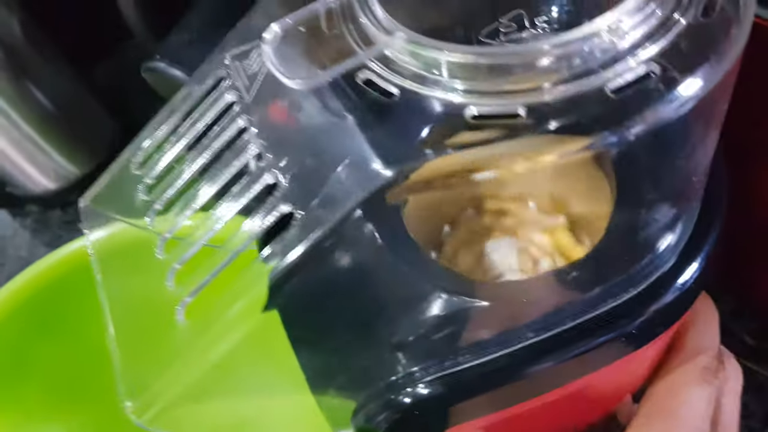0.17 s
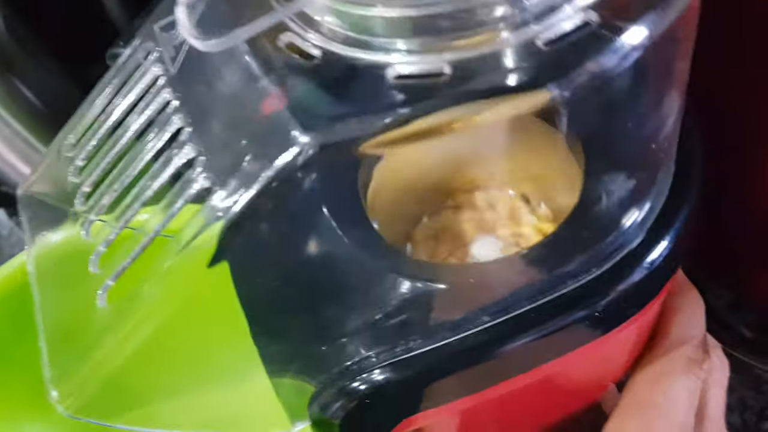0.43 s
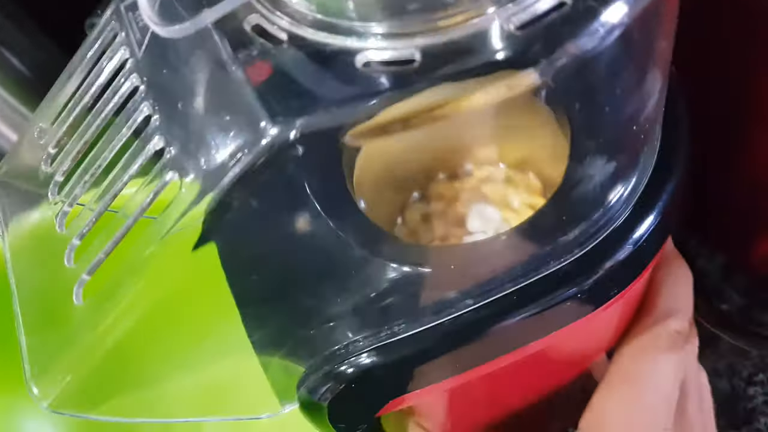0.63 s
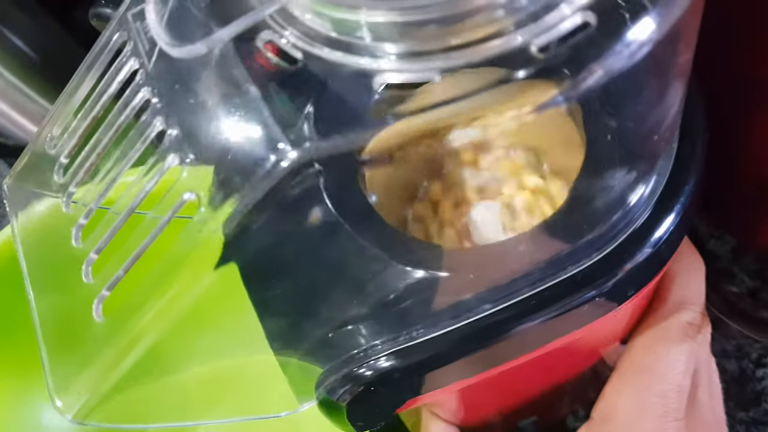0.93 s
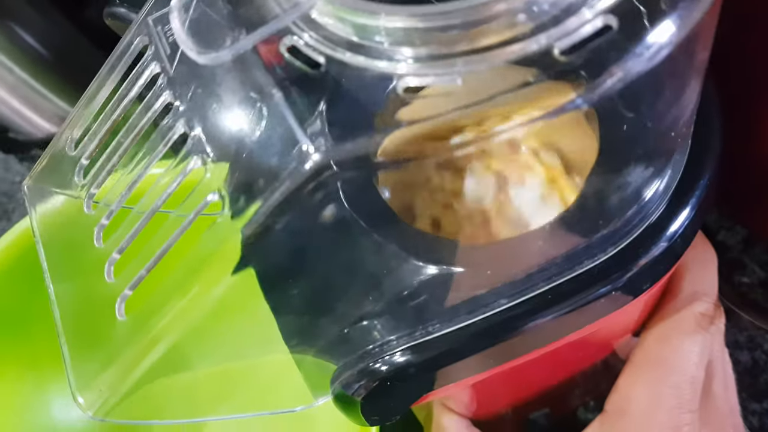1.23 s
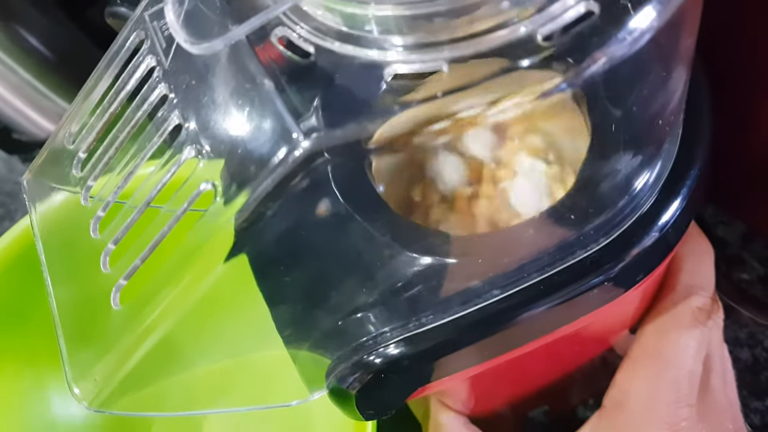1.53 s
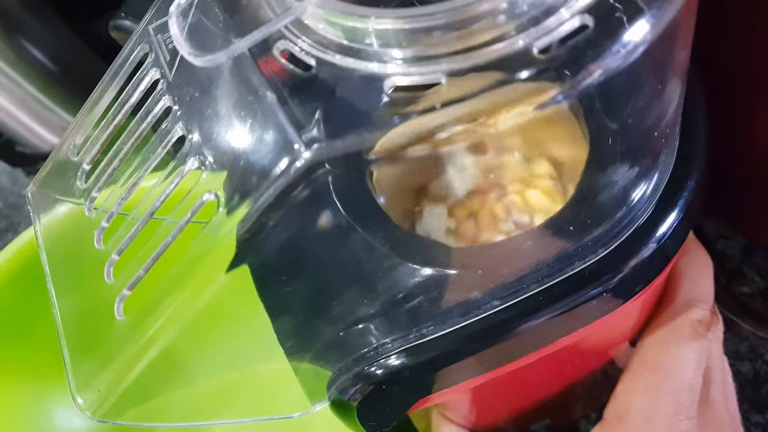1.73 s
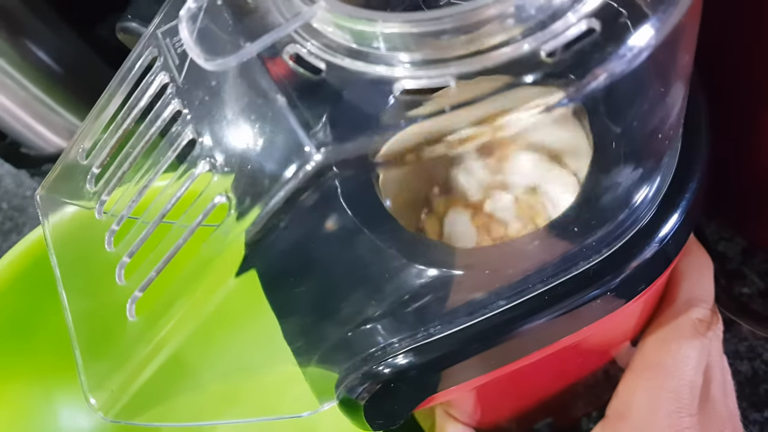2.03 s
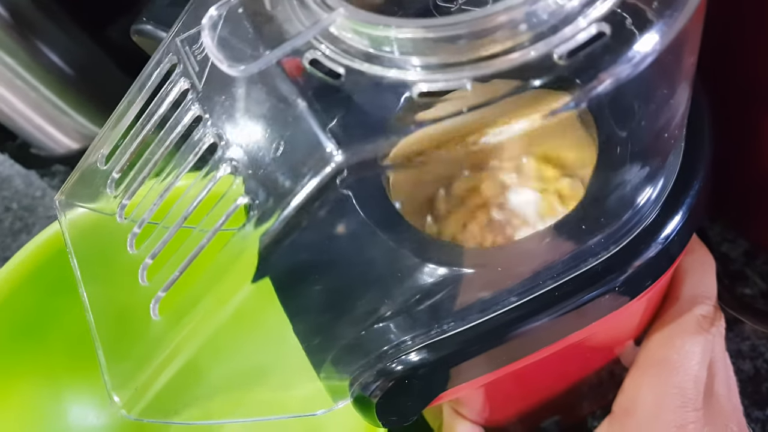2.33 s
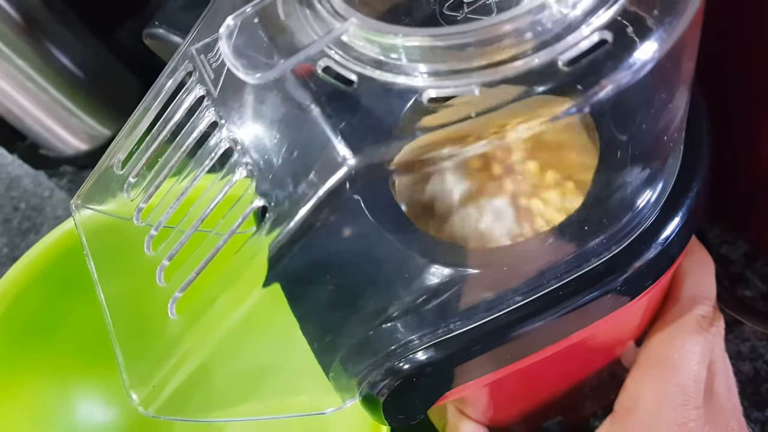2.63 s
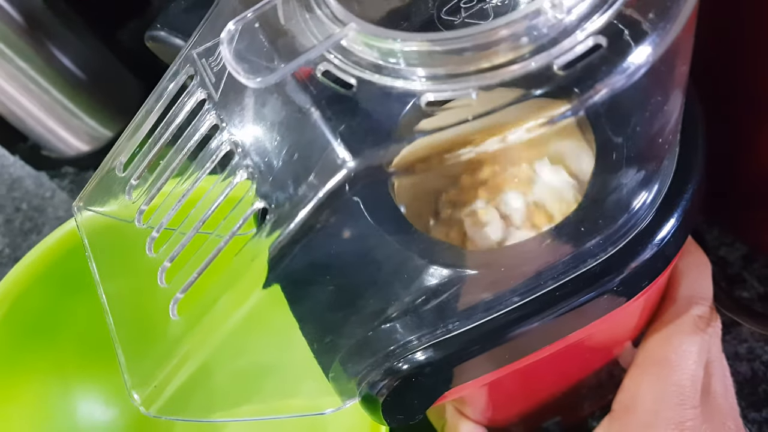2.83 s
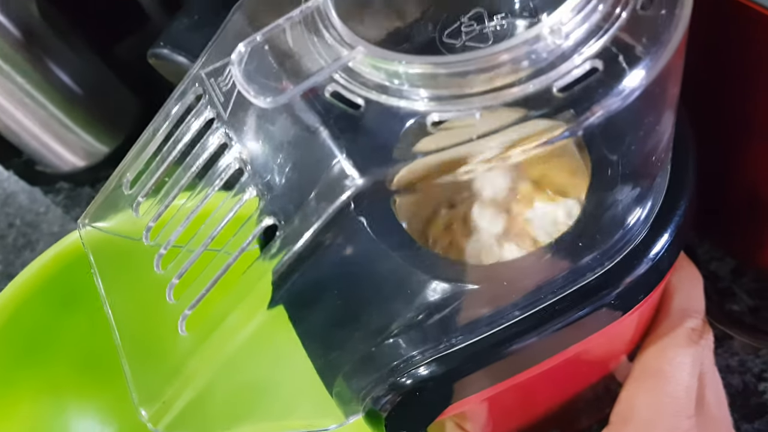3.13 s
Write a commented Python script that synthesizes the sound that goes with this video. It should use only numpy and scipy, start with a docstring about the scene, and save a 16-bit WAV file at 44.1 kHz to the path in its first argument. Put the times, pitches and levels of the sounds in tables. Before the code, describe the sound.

Popcorn maker roars and whines steadily while a few kernels pop with sharp, bright cracks

```python
"""Hot-air popcorn maker, close, in a kitchen

A hand-held pair of microphones stands close to the machine. Filtered noise makes the rushing air and the
whistles of the housing; sines on multiples of the shaft speed make the song of motor and fan.
Kernels tick as short resonances and pop as snaps, cracks, thumps and dying hiss.
After the loud pops the whole roar sinks in steps and swells back a second later."""
import sys
import numpy as np
from scipy import signal
from scipy.fft import rfft, irfft, next_fast_len
from scipy.io import wavfile

SR = 44100
rng = np.random.default_rng(int(sys.argv[2]) if len(sys.argv) > 2 else 0)


def voltage_ratio(decibels):
    """Convert decibels (scalar or array-like) to amplitude ratios, 20 dB per decade."""
    exponent = np.asarray(decibels, float) / 20
    return 10 ** exponent


def materialize(psi):
    """Save the field psi as 16-bit PCM at rate SR to the path in sys.argv[1].

    A 1-D psi becomes a single channel; in a 2-D psi each row is a channel.
    """
    bounded = np.clip(np.atleast_2d(psi).T, -1, 1)
    quanta = np.round(bounded * 32767).astype(np.int16)
    wavfile.write(sys.argv[1], SR, quanta)


N = 145089  # length [samples]

# Rushing air before the rumble cut: (frequency [Hz], left density [dB per Hz], right density [dB per Hz])
AIR_SPECTRUM = [(69.6, -75, -82), (99, -62.5, -62), (144, -67, -67.5), (193, -67, -70.5), (240, -61, -60),
                (335, -60.5, -61), (426, -52.5, -55.5), (444, -56, -64), (595, -50, -50), (680, -44.5, -49),
                (870, -47.5, -56.5), (1064, -47, -52), (1226, -51.5, -61.5), (1405, -53.5, -53.5),
                (1525, -51.5, -52.5), (1710, -51, -64), (1766, -54.5, -63.5), (2480, -62, -66),
                (2450, -58.5, -74.5), (3000, -59.5, -59.5), (3500, -58, -58.5), (4040, -58, -67),
                (4930, -62.5, -58), (5380, -64, -74), (6000, -72, -69), (6700, -66.5, -67.5),
                (7130, -70.5, -72), (9000, -71, -80), (11100, -74, -75), (13000, -77, -81),
                (15000, -80, -78), (15600, -79, -78), (16100, -110, -110)]
# Air at the two microphones: (frequency [Hz], likeness [0-1], lead of the left [rad])
AIR_LIKENESS = [(70, 0.93, 0.0), (100, 0.93, 0.1), (150, 0.89, 0.1), (190, 0.95, -0.1), (230, 0.93, -0.1),
                (320, 0.75, 0.2), (420, 0.85, 0.3), (480, 0.63, 1.2), (600, 0.11, -2.1), (680, 0.9, -0.3),
                (850, 0.81, 1.2), (1000, 0.71, -1.5), (1150, 0.67, -1.0), (1400, 0.8, 0.6),
                (1500, 0.69, 1.7), (1800, 0.3, 2.7), (5000, 0.2, 3)]
# Narrow whistles of the housing: (frequency [Hz], width of each of two passes [Hz], left [dB], right [dB])
WHISTLES = [(762.4, 7.5, -35, -24), (812.4, 2, -31.5, -32.5), (511.3, 9.2, -37, -43),
            (900, 5.5, -41, -32.5), (992, 31, -35, -40), (1627, 26, -37.5, -55), (2466, 73, -42, -41.5),
            (2780, 22, -48, -52), (2960, 8.7, -50, -49), (3420, 59, -42, -41), (4185, 65, -45, -40)]
# The strongest whistle, first in the list, swells and fades: (time [s], level [dB])
FIRST_WHISTLE_LEVEL = [(0, -2), (.5, 0), (.9, 2.5), (1.2, 2), (1.3, -1), (2.0, -4), (2.3, -5), (2.45, 1),
                       (3.29, 1)]
# Speed of the motor shaft: (time [s], turns per second [Hz])
SHAFT_SPEED = [(0, 262.95), (.5, 262.87), (1.1, 262.97), (1.7, 263.14), (2.1, 263.3), (2.6, 263.26),
               (3.29, 263.2)]
# Relative strength of the shaft multiples before the hand shifts the microphones:
# (multiple, left [dB], right [dB], lead of the left [rad])
MULTIPLES_BEFORE = [(1, -20, -20, -0.1), (2, -18, -21, 0.6), (3, -30, -24, 1.0), (4, -30, -36, -1.3),
                    (5, -32, -33, 0.0), (6, -31, -42, 1.5), (7, -36, -36, -1.2), (8, -36, -40, -2.8),
                    (9, -44, -47, 0.2), (10, -46, -45, -2.1), (11, -39, -41, 2.9), (12, -47, -53, -2.2),
                    (13, -43, -39, 0.6), (14, -43, -41, -2.1), (15, -40, -33, 2.8), (16, -43, -45, 0.7),
                    (17, -40, -39, -0.6), (20, -47, -43, -1.9), (24, -64, -54, 2.3), (26, -58, -64, 0.9),
                    (29, -53, -58, 3.0), (30, -46, -48, -3.0), (31, -55, -57, -2.7), (32, -60, -61, -0.5),
                    (34, -53, -64, -1.6), (35, -60, -54, -1.1), (37, -64, -62, 3.0), (39, -68, -63, -0.0),
                    (40, -55, -54, 2.6), (41, -58, -57, 2.8), (44, -61, -60, 3.0), (45, -65, -52, 1.2),
                    (46, -60, -57, 0.8), (47, -61, -58, 0.3), (48, -62, -60, -0.3), (49, -61, -59, -1.4),
                    (50, -62, -65, 3.1), (51, -63, -56, -1.3), (52, -62, -61, 0.4), (53, -69, -63, -3.1),
                    (54, -68, -59, -0.9), (55, -66, -60, -0.7), (56, -67, -58, 1.6), (57, -67, -65, 0.0),
                    (59, -60, -58, 2.2)]
# The same after the shift: (multiple, left [dB], right [dB], lead of the left [rad])
MULTIPLES_AFTER = [(1, -20, -20, -0.1), (2, -18, -25, 0.5), (3, -40, -25, 1.0), (4, -35, -41, -1.8),
                   (5, -33, -38, -0.1), (6, -30, -37, 1.8), (7, -43, -44, -0.7), (8, -43, -41, -2.9),
                   (9, -51, -50, 2.6), (10, -47, -43, -1.8), (11, -52, -52, 3.0), (12, -46, -51, -1.5),
                   (13, -44, -49, 1.1), (14, -49, -40, -1.1), (15, -43, -34, 3.0), (16, -42, -48, 0.4),
                   (17, -38, -41, 1.1), (20, -51, -51, -1.9), (24, -62, -55, 3.2), (26, -56, -56, 2.1),
                   (29, -54, -64, 3.4), (30, -50, -53, -2.5), (31, -57, -57, -3.2), (32, -58, -60, 1.1),
                   (34, -57, -62, 1.3), (35, -62, -69, -4.0), (37, -58, -60, 5.5), (39, -65, -59, -2.8),
                   (40, -59, -55, 0.4), (41, -67, -61, 4.6), (44, -69, -54, 1.9), (45, -58, -65, -0.8),
                   (46, -57, -62, 2.0), (47, -60, -60, -1.0), (48, -62, -71, -2.1), (49, -67, -62, 0.5),
                   (50, -61, -63, 0.4), (51, -67, -59, -2.4), (52, -59, -61, 2.3), (53, -69, -62, -3.5),
                   (54, -57, -61, -3.2), (55, -61, -52, -2.7), (56, -76, -75, 1.0), (57, -64, -68, -0.2),
                   (59, -55, -54, 1.8)]
# How far the microphones have shifted from the first to the second: (time [s], share)
MIC_SHIFT = [(0, 0.14), (.7, 0.047), (1.5, 0.43), (2.4, 0.38), (2.9, 1.03), (3.29, 0.91)]
# Multiples that come and go: (multiple, ...)
WHINE_MULTIPLES = (2, 4, 7, 16, 17)
# Their swell, one level for each of those: (time [s], level [dB], level [dB], ...)
WHINE_LEVELS = [(0, 0, 5, -3, 0, -4), (.35, 0, -1, 1, 1, -2), (1.2, 0, -2, 0, 1, -1),
                (1.6, 0.5, -1, 1, -3, -4), (2.1, 0, 0, 1, -4, -4), (2.45, -2.5, 0, 0, -3, -5),
                (2.9, 1, 0, -3, 0, 0), (3.29, 1, 3, -6, 0, 5)]
# Level of the whole roar: (time [s], level [dB])
ROAR_LEVEL = [(0, -6.5), (.12, -4), (.26, -2.5), (.45, -1), (.75, -0.5), (1.2155, 0), (1.219, -11),
              (1.24, -3), (1.326, -5.5), (1.332, -11), (1.352, -6.5), (1.513, -8), (1.519, -10),
              (1.54, -9.5), (2.0, -9.5), (2.33, -10.5), (2.45, -8.5), (2.62, -9), (2.75, -5), (2.9, -3),
              (3.1, -1.6), (3.29, -2)]
# Pops, before their common gain and pan:
# (time [s], level [dB], brightest frequency [Hz], tail re crack [dB], body re brightest part [dB])
POPS = [(1.2197, -11, 12500, -7, -6), (1.3296, -9, 9200, -10, -13), (1.3412, -21, 4200, -16, -16),
        (1.3475, -23, 4300, -16, -16), (1.5158, -4.5, 10200, -16, -20), (1.5455, -27, 10000, -12, -16),
        (1.5932, -23, 6500, -18, -6), (2.5868, -17.5, 12500, -30, -8), (2.5935, -27, 14000, -30, -16),
        (2.7165, -24, 10400, -18, -14)]
# Rings of the popping chamber: (frequency [Hz], half width [Hz], extra gain [ratio])
CHAMBER_RINGS = [(4060, 530, 2.9), (6200, 170, 1.5), (9300, 410, 0.32), (11400, 500, .6)]

# Air
RUMBLE_CUT_HZ = 92
GUST_DB, FLICKER_DB = .5, .7  # spread of the common gusts and of each band alone
SHAFT_BEAT = .2  # depth of the beat, once per turn
# Motor
MOTOR_DB, DB_PER_DOUBLING = .3, .45  # overall, and added per doubling of the multiple
WAVER_DB, WAVER_RAD, WAVER_HZ = .3, .012, 5.0  # level and lead, growing with the multiple; rate
SMEAR_RAD, SMEAR_POWER = -1.55, 2.22  # phases that shape the pulse
# Ticks
TICKS_PER_S, TICK_DB, TICK_SPREAD_DB = 320, -44, 1.5  # TICK_DB is the level of all ticks together
TICK_LOW_HZ, TICK_HIGH_HZ, TICK_CYCLES = 2550, 11000, 11  # a tick is 44 dB down after TICK_CYCLES
# Pops
POP_GAIN_DB, POP_PAN_DB, POP_LIKENESS = -7, 4, .3  # pan: left over right; likeness: shared power
BELOW_OCT, ABOVE_OCT = .4, .45  # spread of the colour on either side of the brightest frequency
BODY_CUT_HZ = 2800  # the body fades out below this and fills in up to the brightest frequency
CRACK_RISE_S, CRACK_HOLD_S, CRACK_T60_S = .0001, .0024, .007
SNAP_DB, SNAP_HZ = 1.5, 2200
RING_DB, RING_T60_S = -4, .045  # the chamber rings on after the crack
TAIL_RISE_S, TAIL_T60_S = .004, .19
CRACKLE_DB, CRACKLE_S = 3.0, .0012  # spread and spacing of the lumps in the hiss
THUMP_HZ, THUMP_DELAY_S = 90, .008
THUMP_DB, THUMP_FOLLOWS = -8, 1.4  # the fuller the body, the stronger the thump: dB per dB


def at(rows, where, warp=lambda v: v):
    """Columns of a table read between its rows."""
    first, *columns = np.transpose(rows)
    return [np.interp(warp(where), warp(first), c) for c in columns]


def drift(hz):
    """Slow chance with spread 1: noise through two poles at hz, made at every 40th sample."""
    r = np.exp(-80 * np.pi * hz / SR)
    noise = rng.standard_normal(N // 40 + 2002)
    slow = signal.lfilter([1], [1, -2 * r, r * r], noise)[2000:]
    return np.interp(np.arange(N) / 40, np.arange(len(slow)), slow / slow.std())


def resonate(x, hz, width_hz):
    """A two-pole resonance with gain 1 on top."""
    r = np.exp(-np.pi * width_hz / SR)
    zeros = np.array([1, 0, -1]) * (1 - r * r) / 2
    return signal.lfilter(zeros, [1, -2 * r * np.cos(2 * np.pi * hz / SR), r * r], x)


def shaft_angle():
    """Angle of the shaft [rad], summed from its speed."""
    return 2 * np.pi * np.cumsum(at(SHAFT_SPEED, np.arange(N) / SR)[0]) / SR


def air():
    """Coloured stereo noise in octave bands that gust together, flicker alone and beat with the shaft."""
    size = next_fast_len(N)
    hz = np.maximum(np.arange(size // 2 + 1) * SR / size, 1)
    rumble_loss_db = 10 * np.log10(1 + (RUMBLE_CUT_HZ / hz) ** 8)
    left_db, right_db = at(AIR_SPECTRUM, hz, np.log) - rumble_loss_db
    alike, lead = at(AIR_LIKENESS, hz, np.log)
    # scaled to a density of 0 dB per Hz
    one, other = rfft(rng.standard_normal((2, size))) * np.sqrt(SR / 2)
    left = one * voltage_ratio(left_db)
    right = (alike * np.exp(-1j * lead) * one + np.sqrt(1 - alike ** 2) * other) * voltage_ratio(right_db)
    pair = np.array([left, right])
    gust, out = drift(3.4), 0
    for octave in range(5, 16):
        # overlapping bands centred on 2 ** octave Hz
        distance = np.clip(np.log2(np.maximum(hz, 32)) - octave, -1, 1)
        band = irfft(pair * np.cos(np.pi / 2 * distance) ** 2, size)[:, :N]
        out = out + band * voltage_ratio(GUST_DB * gust + FLICKER_DB * drift(32.0))
    return out * (1 + SHAFT_BEAT * np.cos(shaft_angle()))


def whistles():
    """The housing whistles: noise passed twice through each narrow resonance."""
    out = np.zeros((2, N))
    swell_db = at(FIRST_WHISTLE_LEVEL, np.arange(N) / SR)[0]
    for hz, width_hz, left_db, right_db in WHISTLES:
        noise = rng.standard_normal(N + SR)
        # the first second lets the resonance build up
        tone = resonate(resonate(noise, hz, width_hz), hz, width_hz)[SR:]
        is_first = hz == WHISTLES[0][0]
        tone = tone / tone.std() * voltage_ratio(swell_db * is_first)
        out += tone * voltage_ratio(np.array([[left_db], [right_db]]))
    return out


def motor():
    """Sines on multiples of the shaft speed; the high ones waver more, and all change as the microphones shift."""
    t = np.arange(N) / SR
    turn = shaft_angle()
    shift = at(MIC_SHIFT, t)[0]
    whine_db = dict(zip(WHINE_MULTIPLES, at(WHINE_LEVELS, t)))
    out = np.zeros((2, N))
    for (k, *before), (_, *after) in zip(MULTIPLES_BEFORE, MULTIPLES_AFTER):
        left_db, right_db, lead = [a + (b - a) * shift for a, b in zip(before, after)]
        level = voltage_ratio(WAVER_DB * k ** .5 * drift(WAVER_HZ))
        level *= voltage_ratio(MOTOR_DB + DB_PER_DOUBLING * np.log2(k)) / np.sqrt(np.mean(level ** 2) / 2)
        level = level * voltage_ratio(whine_db.get(k, 0))
        half_lead = (lead + WAVER_RAD * k * drift(WAVER_HZ)) / 2
        phase = k * turn + SMEAR_RAD * (k - 1) ** SMEAR_POWER
        sines = np.cos(phase + [half_lead, -half_lead])
        out += level * voltage_ratio(np.array([left_db, right_db])) * sines
    return out


def ticks():
    """Tumbling kernels tap the chamber wall at random; each tap rings briefly at one of 16 pitches."""
    sizes = voltage_ratio(TICK_SPREAD_DB * np.minimum(rng.exponential(1, N), 5)) * rng.choice([-1, 1], N)
    born = rng.random(N) < TICKS_PER_S / SR
    pitch = rng.integers(0, 16, N)
    out = np.zeros((2, N))
    for k, hz in enumerate(np.geomspace(TICK_LOW_HZ, TICK_HIGH_HZ, num=16)):
        taps = sizes * born * (pitch == k) + 1e-18  # the offset keeps the filter off denormals
        rung = resonate(taps, hz, 1.6 * hz / TICK_CYCLES)
        out += rung * [[1], [(-1) ** k]]  # every other pitch is inverted on the right
    return voltage_ratio(TICK_DB) * out / out.std()


def pops():
    """A kernel bursts: a snap, a bright crack of steam, a low thump, and lumpy hiss dying in chamber and kitchen."""
    out, t = np.zeros((2, N + SR)), np.arange(SR // 2) / SR
    hz = np.maximum(np.arange(len(t) // 2 + 1) * 2., 1)
    rings = 1 + sum(gain / (1 + ((hz - top) / width) ** 2) for top, width, gain in CHAMBER_RINGS)
    body = 1 / (1 + (BODY_CUT_HZ / hz) ** 6)
    crack = (1 - np.exp(-t / CRACK_RISE_S)) * voltage_ratio(-60 * np.maximum(t - CRACK_HOLD_S, 0) / CRACK_T60_S)
    snap = -voltage_ratio(SNAP_DB) * np.sin(2 * np.pi * SNAP_HZ * t) * np.exp(-2 * SNAP_HZ * t)
    thump_cycles = np.maximum(t - THUMP_DELAY_S, 0) * THUMP_HZ
    thump = np.sin(2 * np.pi * thump_cycles) * np.exp(-thump_cycles)
    pan_db = POP_PAN_DB * np.array([[.5], [-.5]])
    for s, db, top_hz, tail_db, body_db in POPS:
        both, left, right, lumps = rng.standard_normal((4, len(t)))
        noise = np.sqrt(POP_LIKENESS) * both + np.sqrt(1 - POP_LIKENESS) * np.array([left, right])
        away = np.log2(hz / top_hz) / np.where(hz < top_hz, BELOW_OCT, ABOVE_OCT)
        colour = np.exp(-.5 * away ** 2) + voltage_ratio(body_db) * body * (hz < top_hz)
        noise = irfft(rfft(noise) * colour * rings, len(t))
        lumpy = voltage_ratio(CRACKLE_DB * np.interp(t / CRACKLE_S, np.arange(len(t)), lumps))
        dying = voltage_ratio(RING_DB - 60 * t / RING_T60_S) + voltage_ratio(tail_db - 60 * t / TAIL_T60_S)
        shape = crack + lumpy * dying * (1 - np.exp(-t / TAIL_RISE_S))
        burst = noise / noise.std() * shape + snap + voltage_ratio(THUMP_DB + THUMP_FOLLOWS * body_db) * thump
        i = int(s * SR)
        out[:, i:i + len(t)] += burst * voltage_ratio(db + POP_GAIN_DB + pan_db)
    return out[:, :N]


def scene():
    """The machine under its changing level, with the pops on top."""
    roar_db = at(ROAR_LEVEL, np.arange(N) / SR)[0]
    roar = air() + whistles() + motor() + ticks()
    return voltage_ratio(roar_db) * roar + pops()


def band_limit(x):
    """A steep low-pass at the top of the band."""
    return signal.sosfilt(signal.butter(12, 16500, fs=SR, output="sos"), x)


def record(dry):
    """The microphone signal loses its top: a steep low-pass, 50 dB down from 16.8 kHz up."""
    top_cut = signal.cheby2(10, 50, 16800, fs=SR, output="sos")
    mix = signal.sosfilt(top_cut, dry)
    return band_limit(mix)


dry = scene()
out = record(dry)
materialize(out)
```